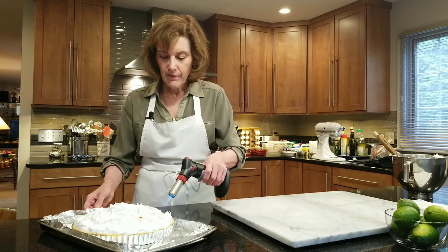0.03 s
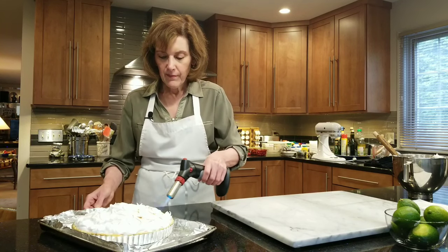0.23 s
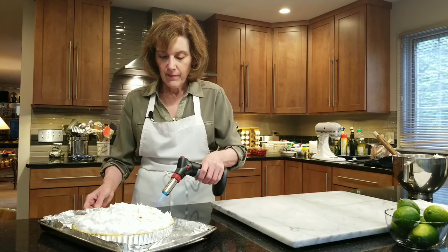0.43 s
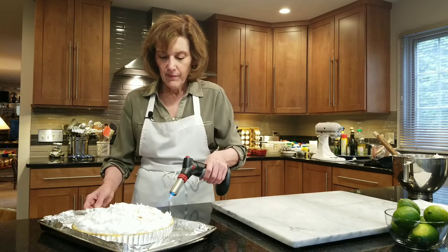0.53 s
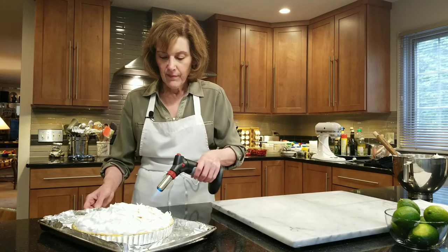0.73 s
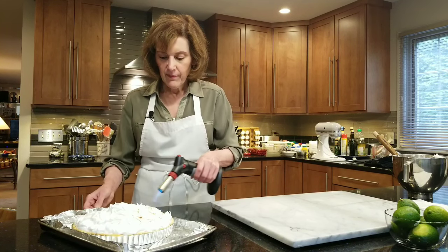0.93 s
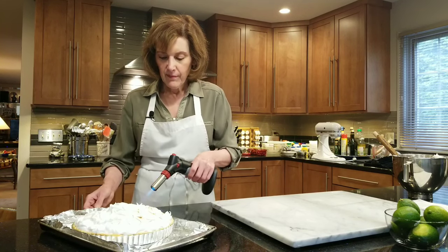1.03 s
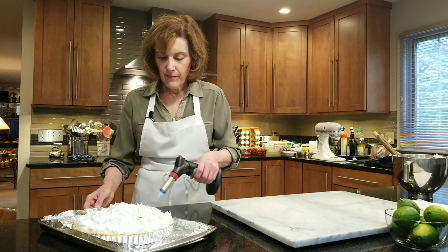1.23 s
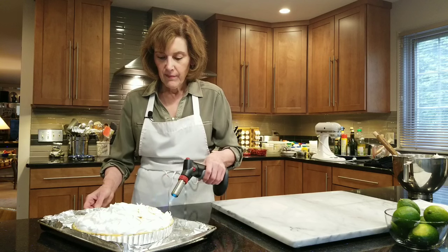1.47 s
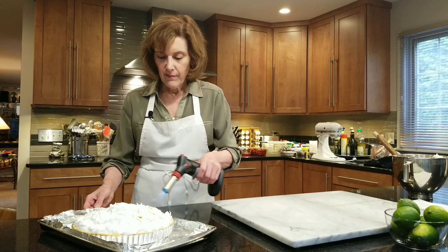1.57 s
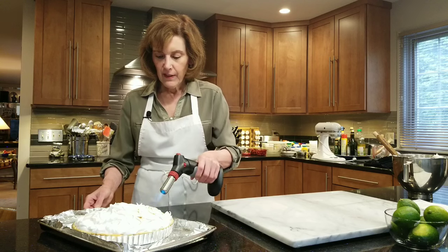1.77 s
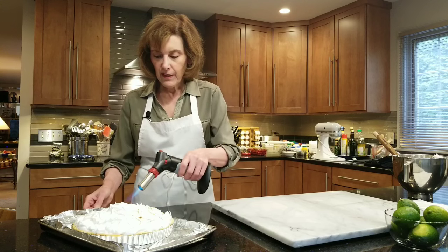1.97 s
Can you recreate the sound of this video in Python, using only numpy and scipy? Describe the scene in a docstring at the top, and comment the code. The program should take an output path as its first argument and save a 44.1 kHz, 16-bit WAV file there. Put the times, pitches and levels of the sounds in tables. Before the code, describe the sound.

A small gas blowtorch burns close by throughout, a soft, low, fluttering rush over very faint hiss. Right at the start, something hard hits a counter, louder than the flame, and bounces at about 0.1 and 0.2 seconds, ringing briefly in the kitchen. The flame carries on with occasional small puffs. From about 1.8 seconds come a few tiny dry ticks, and the flame sputters just before 2 seconds.

```python
"""A home kitchen on one microphone, near a small gas blowtorch. From the start the flame gives a low
turbulent rush of dense soft puffs, over a faint whistling band of gas hiss and the microphone's own hiss.
Almost at once something hard drops on a counter and bounces twice, the room ringing after it.
Near the end come a few tiny dry ticks, and the flame sputters."""
import sys
import numpy as np
from scipy import signal
from scipy.fft import rfft, irfft, next_fast_len
from scipy.io import wavfile
from scipy.ndimage import map_coordinates

SR = 44100
rng = np.random.default_rng(int(sys.argv[2]) if len(sys.argv) > 2 else 0)


def log_audio(samples):
    """Write samples as a 16-bit WAV file to the path given in sys.argv[1]."""
    # one column per channel
    frames = np.atleast_2d(samples).T
    # limit to full scale, then quantise
    limited = np.clip(frames, -1, 1)
    pcm = np.round(limited * 32767).astype(np.int16)
    wavfile.write(sys.argv[1], SR, pcm)


N = 88200


def amp(db):
    """Decibels to gain."""
    return 10 ** (np.asarray(db) / 20)


def unit_rms(x):
    """The signal scaled to rms 1."""
    return x / np.sqrt(np.mean(x ** 2) + 1e-20)


def at_hz(rows, hz):
    """Read (Hz, value) rows on a log frequency axis."""
    freqs, values = np.transpose(rows)
    return np.interp(np.log(hz + 1), np.log(freqs + 1), values)


def curve(rows):
    """One value per sample from (seconds, value) rows."""
    return np.interp(np.arange(N) / SR, *np.transpose(rows))


def wobble(rate):
    """A smooth random curve with `rate` knots a second."""
    knots = rng.standard_normal(int(N * rate / SR) + 4)
    return map_coordinates(knots, [np.arange(N) * rate / SR])


def filtered(x, response):
    """Zero-phase filter; `response` gives the gain at each frequency."""
    size = next_fast_len(N + SR // 2)
    return irfft(rfft(x, size) * response(np.fft.rfftfreq(size, 1 / SR)), size)[..., :N]


def coloured_click(colour, size=4096):
    """A minimum-phase click of peak 1, its spectrum set by (Hz, dB) rows."""
    cepstrum = irfft(at_hz(colour, np.fft.rfftfreq(size, 1 / SR)) * np.log(10) / 20, size)
    cepstrum[1:size // 2] *= 2
    cepstrum[size // 2 + 1:] = 0
    click = irfft(np.exp(rfft(cepstrum)), size)[:size // 2]
    return click / np.abs(click).max()


# The flame's strength at the microphone. Each row: time in seconds, level in dB.
FLAME_LEVEL = [(0, -48), (.2, -52.5), (.33, -50), (.38, -49.5), (.64, -49), (.8, -51), (.99, -50.5),
               (1.02, -47), (1.045, -53.5), (1.12, -48), (1.15, -51.5), (1.3, -50), (1.4, -50.5),
               (1.46, -53), (1.72, -51.5), (1.81, -49.5), (1.85, -54.5), (1.92, -51)]
# The flame's colour, with room resonances at 187 and 250 Hz.
# Each row: frequency in Hz, relative level in dB.
FLAME_COLOUR = [(20, -41.5), (60, -19.5), (105, -15), (140, -5), (165, -3.5), (187, 0), (215, -4),
                (250, 1.5), (280, -1.5), (330, 0.5), (430, -4), (500, -3.5), (640, -9.5), (820, -20.5),
                (1000, -33), (1300, -46.5), (3500, -56.5), (6000, -104)]
# The flame's upper edge. Each row: time in seconds, gain above EDGE_HZ in dB.
FLAME_EDGE = [(0, 3), (.45, 0), (1.05, 0), (1.13, 3), (1.2, 1), (1.47, 3), (1.6, 0), (1.9, 0), (1.94, -3)]
# Single strong puffs. Each row: time in seconds, size in dB over a typical puff,
# push (+1) or pull (-1), upper cutoff in Hz.
SPUTTER_PUFFS = [(.365, 17.5, 1, 935), (.565, 14, -1, 1010), (1.02, 10, 1, 900), (1.106, 15.5, 1, 710),
                 (1.297, 15.5, -1, 1230), (1.733, 8, 1, 890), (1.803, 10, 1, 790), (1.936, 19, 1, 605),
                 (1.9405, 21.5, 1, 580), (1.952, 13, -1, 594), (1.958, 10, 1, 610), (1.962, 26, 1, 610),
                 (1.9745, -2, 1, 600), (1.986, 22.5, 1, 610), (1.9905, 24, 1, 625), (1.9997, 23.5, -1, 444)]
PUFFS_PER_S, PUFF_SPREAD_DB, FLUTTER_DB = 800, 2.4, 1
EDGE_HZ, SPUTTER_LOW_HZ = 640, 166


def flame():
    """Burning gas: dense puffs, partly smeared by the kitchen into an even, resonant rush, and sputters."""
    chance, size, side = rng.random((3, N))
    puff_gain = amp(-PUFF_SPREAD_DB * np.log(size + 0.0027))
    puffs = (chance < PUFFS_PER_S / SR) * puff_gain * np.sign(side - .5)
    typical_puff = np.sqrt(np.mean(puffs[puffs != 0] ** 2))
    rush = puffs + np.std(puffs) * rng.standard_normal(N)  # even noise stands for the room's smear
    colour = lambda hz: amp(at_hz(FLAME_COLOUR, hz))
    level_db = curve(FLAME_LEVEL)
    roar = filtered(rush * amp(level_db + FLUTTER_DB * wobble(rate=14.25)), colour)
    edge = filtered(roar, lambda hz: 1 / (1 + (EDGE_HZ / (hz + 1)) ** 8))
    out = roar + (amp(curve(FLAME_EDGE)) - 1) * edge
    low_cut = lambda hz: 1 / (1 + (SPUTTER_LOW_HZ / (hz + 1)) ** 2)
    for start, db, sign, top_hz in SPUTTER_PUFFS:
        sputter = np.zeros(N)
        sputter[round(start * SR)] = np.sign(sign) * typical_puff * amp(db + np.median(level_db))
        out += filtered(sputter, lambda hz: colour(hz) * low_cut(hz) / (1 + (hz / top_hz) ** 8))
    return out / np.std(filtered(rush, colour))


# The gas jet, faint at the microphone. Each row: time in seconds, level in dB.
JET_LEVEL = [(0.3, -93), (0.53, -96), (0.684, -92.5), (0.852, -99), (0.948, -90), (1.084, -98),
             (1.838, -99), (1.906, -108), (1.93, -93)]
JET_HZ, JET_WIDTH_HZ = 6040, 250


def gas_jet():
    """Escaping gas whistles in a narrow band of hiss that comes and goes."""
    band = filtered(rng.standard_normal(N), lambda hz: np.exp(-((hz - JET_HZ) / JET_WIDTH_HZ) ** 2 / 2))
    return amp(curve(JET_LEVEL)) * unit_rms(band)


# The drop and two bounces on the counter. Each row: start in seconds, level in dB,
# impulse into the room in dB over that level, treble loss in dB.
CONTACTS = [(.0319, -29, 8, 1.5), (0.1281, -33.5, 4, 11), (0.2067, -44.5, 2.5, 13)]
# A knock's colour. Each row: frequency in Hz, relative level in dB.
CONTACT_COLOUR = [(200, -48), (550, -10.5), (660, -5), (880, -7), (1100, 3), (1250, -4), (1500, 0.4),
                  (1900, -4.5), (2250, -4.5), (2600, -9.5), (3200, -8.5), (3600, -19.5), (5000, -21.5),
                  (6200, -25.5), (8000, -28.5), (12000, -37.5), (14000, -46), (15400, -65)]
# A knock's direct click and its first quick echoes off nearby surfaces.
# Each row: delay in seconds, relative level in dB, push (+1) or pull (-1).
CONTACT_EARLY_REFLECTIONS = [(0, 0, 1), (.0011, -4, 1), (.0017, -7, 1), (.0025, -3, 1), (.003, -5, 1),
                             (.0052, -9, 1), (.0068, -5, 1)]
# The dropped thing's modes. Each row: pitch in Hz, level in dB relative to the knock, t60 in seconds.
OBJECT_MODES = [(660, -13, 0.043), (1108, -21.5, 0.48), (1408, -24, .35), (2970, -19.5, 0.027)]
SCRAPE_DB, SCRAPE_T60_S, DULL_HZ = -14, 0.003, 4000


def dropped_object():
    """A hard thing hits the counter: each contact clicks, rings its modes and echoes in the room."""
    out, body = np.zeros(N), coloured_click(CONTACT_COLOUR)
    click_t, ring_t = np.arange(SR // 200) / SR, np.arange(SR // 2) / SR
    for start, db, room_db, dull_db in CONTACTS:
        early, blow = np.zeros((2, N))
        for delay, click_db, sign in CONTACT_EARLY_REFLECTIONS:
            click = amp(SCRAPE_DB - 60 * click_t / SCRAPE_T60_S) * rng.standard_normal(len(click_t))
            click[0] = np.sign(sign)  # a sharp spike leads the brief noise
            early[round((start + delay) * SR):][:len(click_t)] += amp(db + click_db) * click
        blow[round(start * SR)] = amp(db + room_db)
        knock = early + kitchen_reverb(blow)
        lows = signal.lfilter(*signal.butter(2, DULL_HZ, fs=SR), knock)
        out += signal.fftconvolve(lows + amp(-dull_db) * (knock - lows), body)[:N]
        for hz, mode_db, t60 in OBJECT_MODES:
            ring = amp(db + mode_db - 60 * ring_t / t60) * np.sin(2 * np.pi * hz * ring_t)
            out[round(start * SR):][:len(ring_t)] += ring
    return out


# The kitchen around the microphone. Each row: frequency in Hz, t60 of the early decay in seconds.
KITCHEN_DECAY = [(300, 0.26), (1300, 1), (3500, 0.4), (9000, 1), (14000, 0.4)]
ROOM_DELAY_S, ROOM_RISE_S, ROOM_BEND_S = 0.0019, 0.0063, 0.28


def kitchen_reverb(x):
    """Reflections as a fresh noise tail: each frequency dies at its own speed, and faster late on."""
    hz, t, spectrum = signal.stft(rng.standard_normal(SR), SR, nperseg=256)
    decay_db = -60 * t / at_hz(KITCHEN_DECAY, hz)[:, None] - 20 * (t / ROOM_BEND_S) ** 2
    tail = signal.istft(spectrum * amp(decay_db), SR, nperseg=256)[1]
    tail *= 1 - np.exp(-np.arange(len(tail)) / SR / ROOM_RISE_S)
    tail = np.pad(tail, (round(ROOM_DELAY_S * SR), 0))
    return signal.fftconvolve(x, tail / np.linalg.norm(tail))[:N]


# Tiny dry ticks. Each row: start in seconds, level in dB, pitch in Hz, t60 in seconds.
DRY_TICKS = [(1.8374, -70, 9800, .0015), (1.8634, -67, 10800, .003), (1.8744, -56, 8800, .0012),
             (1.9106, -68, 11600, .005), (1.9236, -68, 8500, .0015), (1.9292, -66, 11500, .004),
             (1.9514, -66, 8500, .0015), (1.955, -62, 11000, .0025)]
RUSTLE_DB, RUSTLE_S, RUSTLE_HZ, RUSTLE_WIDTH_HZ = -92, .015, 10800, 2500


def ticks():
    """Very short high pings, each amid a little high rustle."""
    out, rustle_envelope = np.zeros((2, N))
    t = np.arange(SR // 50) / SR
    attack = 1 - np.exp(-t / 0.000069)
    rustle = filtered(rng.standard_normal(N),
                      lambda hz: np.exp(-((hz - RUSTLE_HZ) / RUSTLE_WIDTH_HZ) ** 2))
    for start, db, hz, t60 in DRY_TICKS:
        out[round(start * SR):][:len(t)] += amp(db - 60 * t / t60) * np.sin(2 * np.pi * hz * t) * attack
        rustle_envelope += np.exp(-((np.arange(N) / SR - start) / RUSTLE_S) ** 2)
    return out + amp(RUSTLE_DB) * rustle_envelope * unit_rms(rustle)


def scene():
    """All that reaches the microphone, in one channel."""
    return (flame() + dropped_object() + ticks() + gas_jet())[None]


# The microphone's own hiss. Each row: frequency in Hz, relative level in dB.
MIC_HISS_COLOUR = [(300, -1.5), (1200, 2.5), (2500, -1), (5000, -2), (9000, -2), (13000, -1.5), (15400, -3)]
HISS_DB, TOP_HZ = -82, 15520


def record(dry):
    """The microphone adds its steady hiss and passes nothing above TOP_HZ."""
    hiss = filtered(rng.standard_normal(N), lambda hz: amp(at_hz(MIC_HISS_COLOUR, hz)) * (hz < TOP_HZ))
    return filtered(dry + amp(HISS_DB) * unit_rms(hiss), lambda hz: hz < TOP_HZ)


dry = scene()
out = record(dry)
log_audio(out)
```